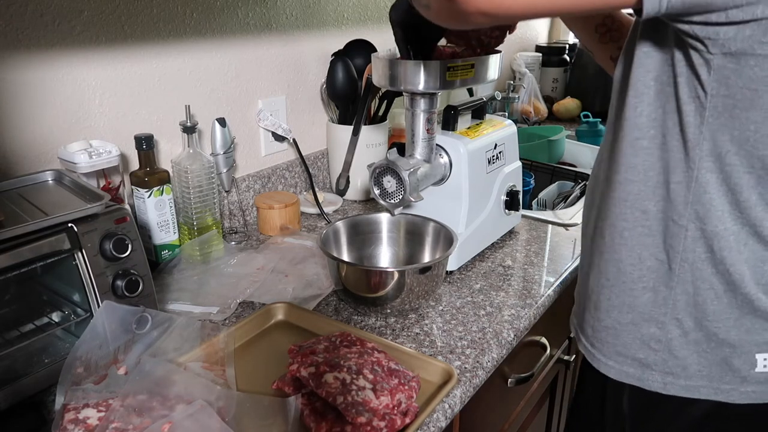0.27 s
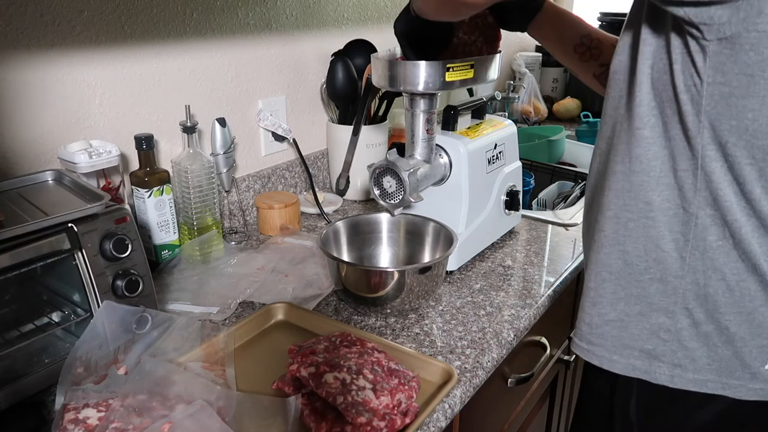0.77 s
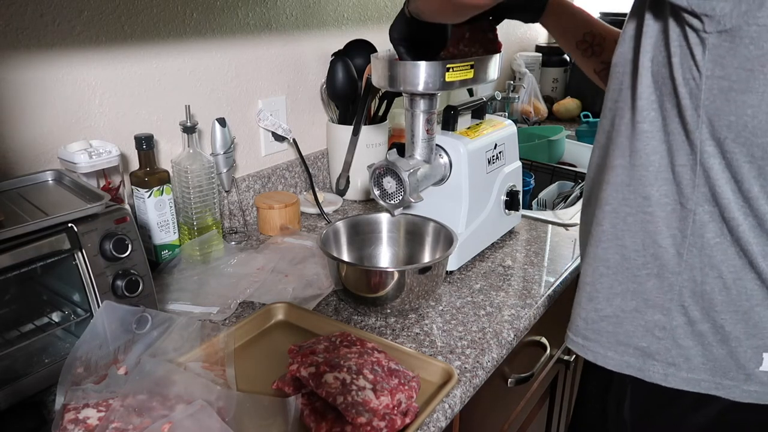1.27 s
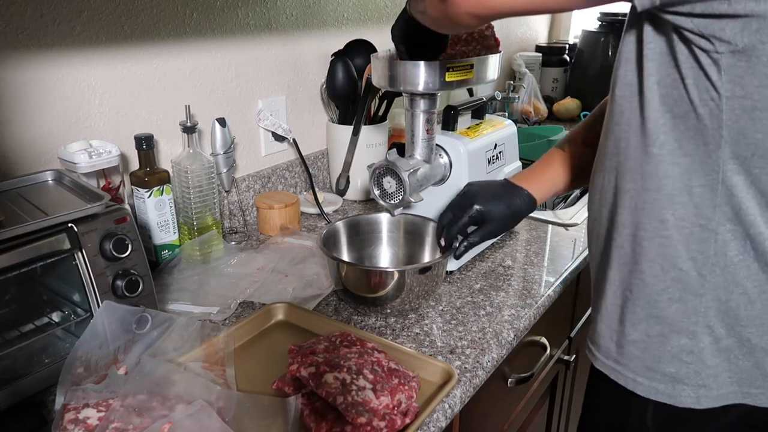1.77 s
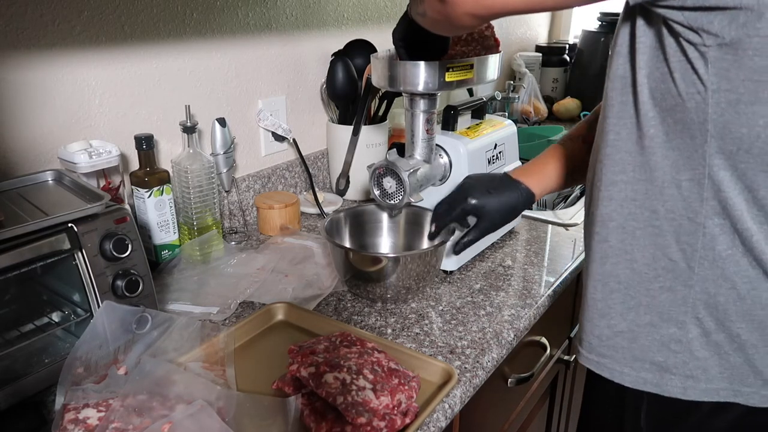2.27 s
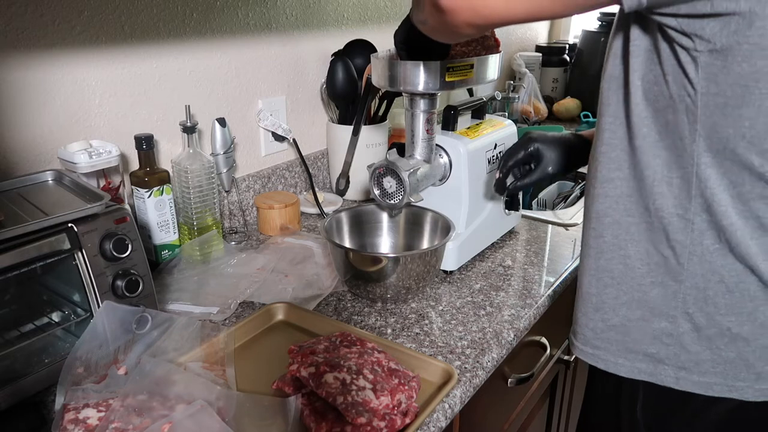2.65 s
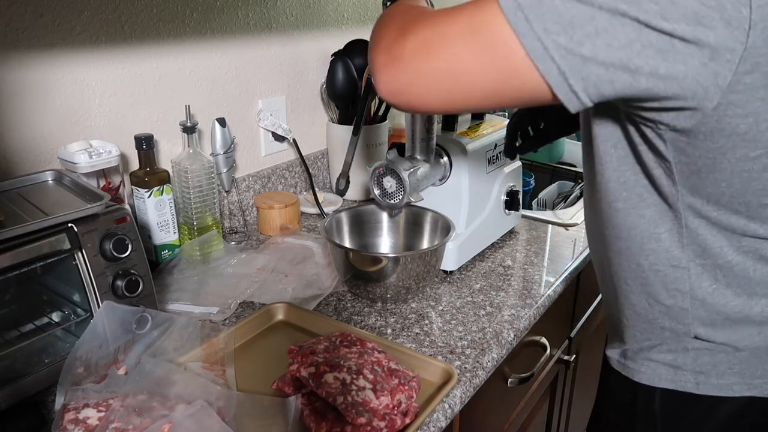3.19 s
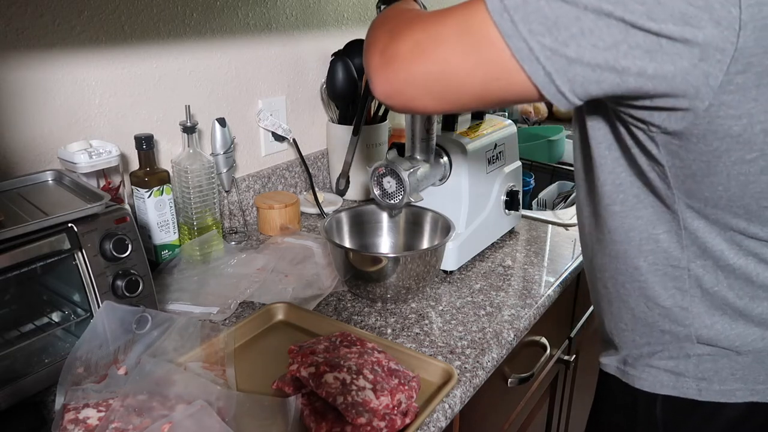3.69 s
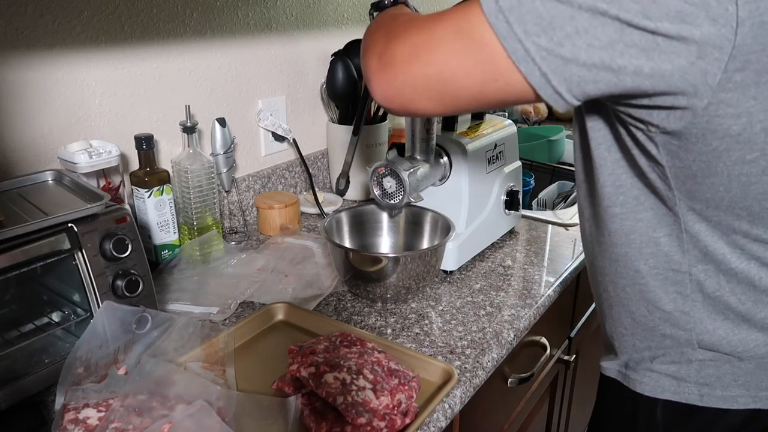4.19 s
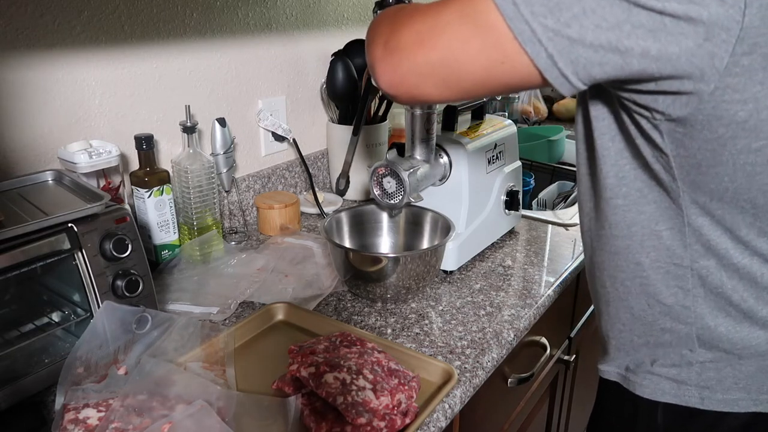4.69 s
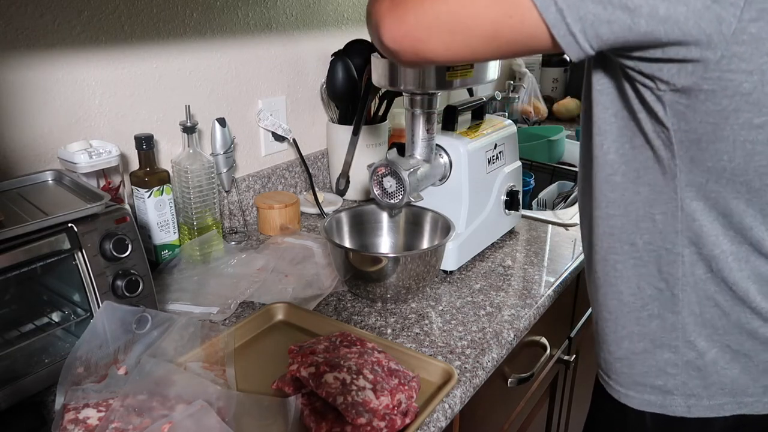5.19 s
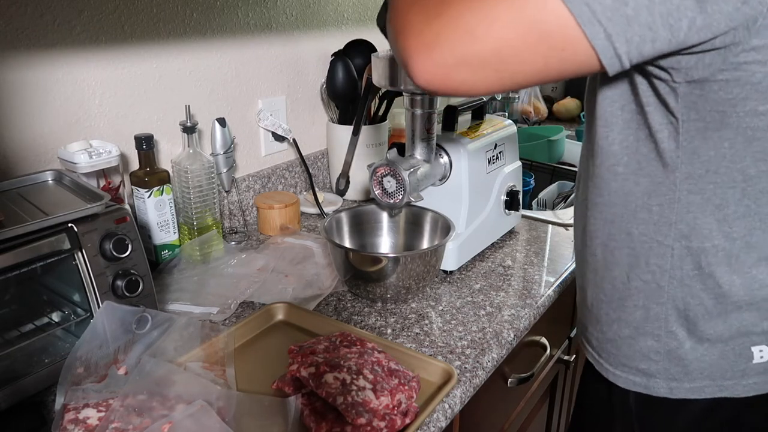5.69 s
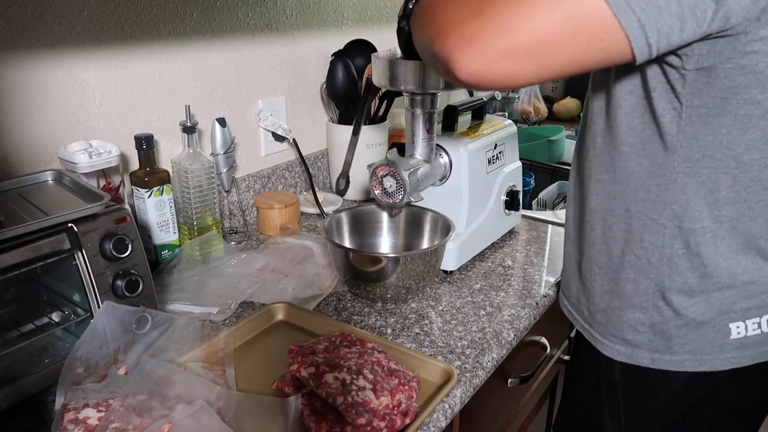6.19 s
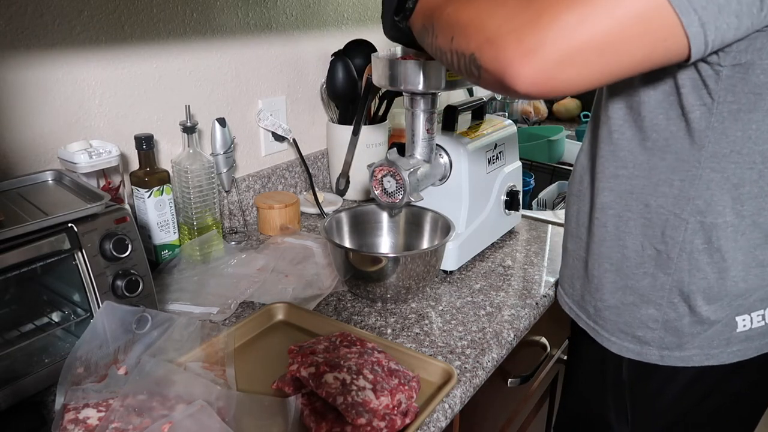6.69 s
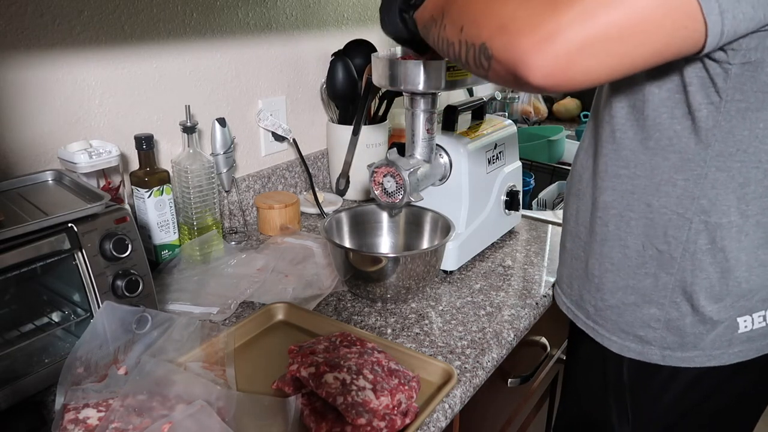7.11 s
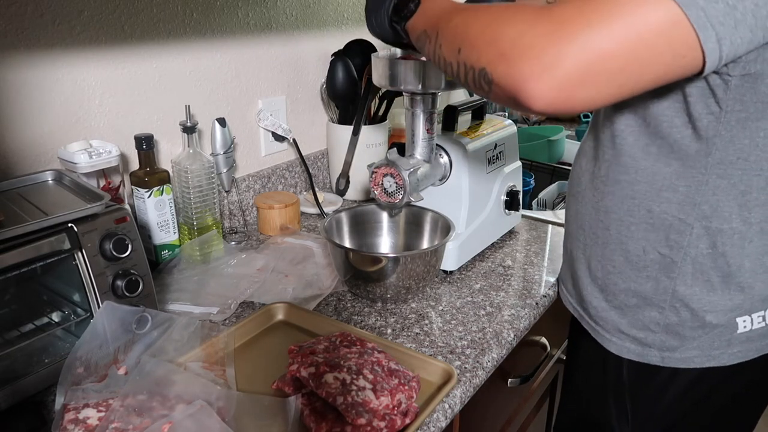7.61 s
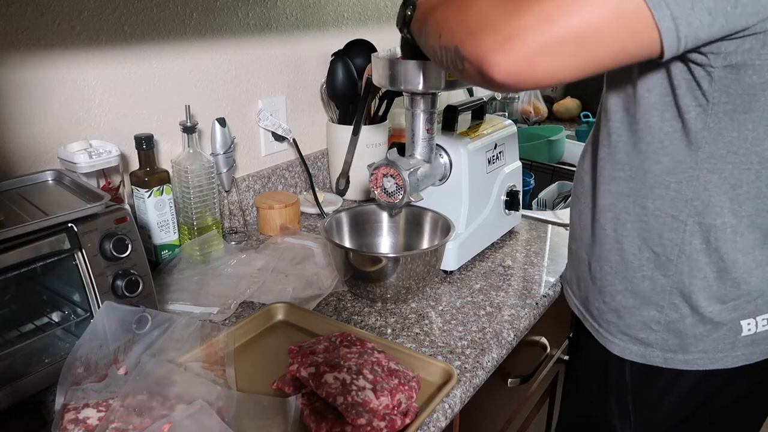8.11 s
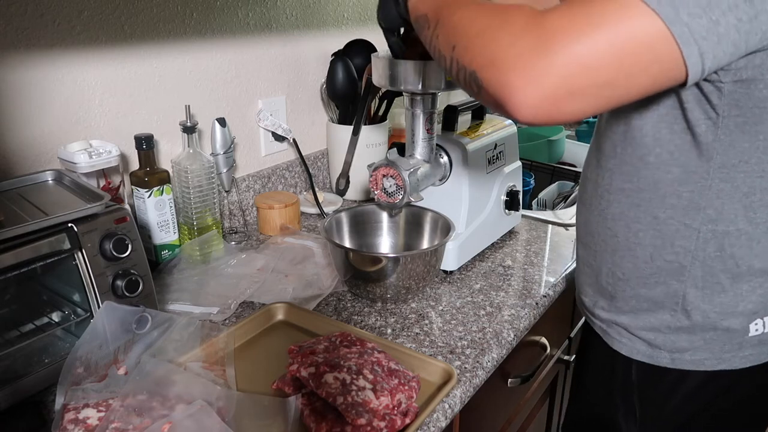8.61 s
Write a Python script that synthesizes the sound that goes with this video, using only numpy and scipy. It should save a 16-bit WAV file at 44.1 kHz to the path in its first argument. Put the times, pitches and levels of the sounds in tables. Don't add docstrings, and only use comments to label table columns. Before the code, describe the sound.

An electric meat grinder is already running on a stone kitchen counter, with a high gear whine, low hum, rough rattle and light hiss. Around two seconds a knuckle knocks the counter once, with tiny rebounds. The motor then labors, pitch sinking and rattle dulling, before recovering slightly at the end. Close, dry stereo from a small camera microphone, mostly centered.

```python
import sys
import numpy as np
from scipy import signal
from scipy.fft import irfft
from scipy.io import wavfile
from scipy.ndimage import uniform_filter1d

SR = 44100
rng = np.random.default_rng(int(sys.argv[2]) if len(sys.argv) > 2 else 0)


def file_out(sig):
    cols = np.atleast_2d(sig).T
    lim = np.clip(cols, -1, 1)
    pcm = np.round(lim * 32767).astype(np.int16)
    wavfile.write(sys.argv[1], SR, pcm)


def volts(x):
    e = np.asarray(x, float) / 20
    return 10 ** e


N = 390285

PINION, WHEEL = 7, 47
FAN_BLADES = 13
# (time [s], shaft speed [Hz], looseness of the gears [dB], push on the teeth [dB])
DRIVE = [(0.0, 266.3, 1, -0.5), (0.16, 264.8, 1.7, 1), (0.77, 267, 1.5, 2), (1.16, 260.7, 1.5, 0.5),
         (2.29, 260.9, 1, 0.5), (2.74, 255.5, 0.3, 0.5), (3.29, 257, 2.5, -3.5), (3.47, 253.1, 2.0, -1),
         (4.32, 252.3, -0.7, -1), (4.57, 253.8, 0.5, -1), (5.15, 249.3, -0.2, -0.5), (5.52, 250.5, 1.4, 1),
         (5.75, 243.4, -1.5, 0), (6.1, 241.5, -0.5, 0), (6.45, 238.5, -2.4, 0.5), (7.27, 243.8, -3.5, -0.5),
         (7.52, 243, -4.5, 0), (8.85, 248.6, 0.3, -1)]
# (frequency [Hz], side minus mid [dB])
PORT_SPREAD = [(60, -43), (110, -33), (200, -49), (370, -13.5), (690, -27.5), (1260, -21), (2320, -20),
               (4270, -7.5), (7850, -0.5), (14400, 3)]


def evened(x):
    return x / np.sqrt(np.mean(abs(x) ** 2) + 1e-20)


def read(points, hz):
    f, value = np.transpose(points)
    return np.interp(np.log(hz + 1), np.log(f + 1), value)


def curves(rows, t):
    s, *columns = np.transpose(rows)
    return [np.interp(t, s, c) for c in columns]


def wander(rate_hz):
    hz = np.fft.fftfreq(2048, 200 / SR)
    spectrum = rng.standard_normal((2048, 2)) @ [1, 1j] / (1 + (hz / rate_hz) ** 2)
    return np.interp(np.arange(N) / 200, np.arange(2048), evened(np.fft.ifft(spectrum)))


def band(hz, lo_hz, hi_hz):
    return np.clip((hz - lo_hz) / (hi_hz - lo_hz), 0, 1)


def contact_db(events, t):
    out = np.zeros(N)
    for s, db, length in events:
        near = slice(max(round((s - length) * SR), 0), round((s + length) * SR))
        out[near] += db * np.exp(-(2 * (t[near] - s) / length) ** 4)
    return out


def kitchen():
    mains_hz, mains_db, rumble_db = 59, -78, -82
    phasor = np.exp(2j * np.pi * mains_hz * np.arange(N) / SR)
    hum = np.sqrt(2) * volts(mains_db) * (1 + 0.36 * wander(2.5)) * phasor
    deep = signal.butter(1, [25, 70], "band", fs=SR, output="sos")
    rumble = signal.sosfilt(deep, rng.standard_normal(N))
    both = hum.real + volts(rumble_db) * evened(uniform_filter1d(rumble, size=200))
    return np.array([both, volts(-34) * both[::-1]])


def knocks():
    # (time [s], level [dB], hardness [0-1])
    contacts = [
        (2.165, -17, 1.),
        (2.177, -28, .5),
        (2.203, -25, .7),
    ]
    # (frequency [Hz], level [dB], t60 [s])
    counter_modes = [(105, -6, .18), (140, -3, .24), (205, 7, .14), (300, 0, .11), (390, -4, .12),
                     (510, -1, .1), (640, -3, .1), (950, 0, .07), (1180, 0, .04), (1420, 5, .05)]
    out, t = np.zeros(N), np.arange(12000) / SR
    dull = signal.butter(2, [150, 2600], "band", fs=SR, output="sos")
    tick = np.exp(-((t - .0012) / .00012) ** 2) - .4 * np.exp(-((t - .0006) / .0003) ** 2)
    for s, db, hard in contacts:
        ring = np.zeros(len(t))
        for f, mode_db, t60 in counter_modes:
            swell = 1 - np.exp(-t * f * 0.76)
            decay = volts(mode_db - 60 * t / t60) * hard ** (f / 700)
            ring += decay * swell * np.sin(2 * np.pi * f * t)
        smear = signal.sosfilt(dull, rng.standard_normal(len(t)) * volts(-60 * t / 0.075))
        out[round(s * SR):][:len(t)] += volts(db) * (.2 * ring + .8 * hard * smear + 1.2 * hard * tick)
    return np.array([out, volts(-31) * out])


def screw_swing():
    screw_per_shaft, start_turn = .012179, 0.031
    shaft = np.cumsum(curves(DRIVE, np.arange(N) / SR)[0]) / SR
    return np.cos(2 * np.pi * (screw_per_shaft * shaft - start_turn))


def shaft_turns():
    ripple_hz, ripple_free_hz = 0.94, 0.44
    hz = curves(DRIVE, np.arange(N) / SR)[0]
    free = (hz - 250) / 15
    return np.cumsum(hz + (ripple_hz + ripple_free_hz * free) * screw_swing()) / SR


def wheel_flaws(turns, changes_per_s=2.5):
    # (multiple of the wheel's turn, extra level [dB])
    strong_flaws = [(8, 6), (12, 5), (17, 4), (18, 4), (19, 4), (24, 3), (25, 4), (34, 5), (36, 4), (51, 4),
                    (62, 4), (73, 3), (74, 3), (76, 5), (83, 5)]
    order = np.arange(4097)
    lines = rng.standard_normal((40, 4097, 2)) @ [1, 1j] * (order < 150) * (order > 4)
    lines *= volts(1.8 * rng.standard_normal(4097))
    lines[:, [k for k, _ in strong_flaws]] *= volts(np.array([db for _, db in strong_flaws]))
    patterns = irfft(lines / np.sqrt(np.mean(abs(lines[:, :150]) ** 2)))
    place = (turns * PINION / WHEEL % 1 * 8192).astype(int)
    age = np.clip(np.arange(N) / SR * changes_per_s, 0, 38)
    old, fade = age.astype(int), np.pi / 2 * (age % 1)
    return evened(patterns[old, place] * np.cos(fade) + patterns[old + 1, place] * np.sin(fade))


def housing_power(hz, free):
    # (frequency [Hz], level [dB per Hz])
    broad_colour = [(30, -42), (80, -29), (165, -13), (200, 3.5), (330, -2), (560, -17.5), (1030, -3.5),
                    (1500, -3), (3600, 2), (4500, -8), (8000, -23), (13500, -33), (14100, -51),
                    (15000, -50)]
    # (frequency [Hz], width [Hz], level [dB], gain when the motor runs free [dB])
    housing_modes = [(116, 28.4, 2, 0.5), (209, 20.5, 11.5, 1.5), (428, 38, 2, -2.5),
                     (647.5, 126, 7.5, -0.5), (799, 122, 4.5, 0), (924, 35, 2.5, 6.5), (1284, 46, 3, 1.5),
                     (1705, 127, 5.5, -6), (1920, 103, 5, 2), (2228, 160, 1.5, 2), (2541, 76, 9, -1),
                     (2692, 164, 5.5, 1), (2863, 68, 11, -1.5), (3085, 72, 8.5, -3.5),
                     (3346, 130, 11, -5.5), (4120, 66, -4, -10)]
    power = volts(2 * read(broad_colour, hz))[:, None]
    for f, width, db, free_db in housing_modes:
        peak = 1 / (1 + (2 * (hz - f) / width) ** 2) ** 2
        power = power + np.outer(peak, volts(2 * (db + free_db * free)))
    return power


def noise_level_db(hz, t, free):
    # (usual level [dB], slope [dB per dB of looseness])
    noise_layers = [
        (-70.5, 1.1),
        (-41.5, 0.93),
        (-38, 0.97),
        (-50.5, 1.02),
    ]
    loose = curves(DRIVE, t)[1]
    low, rumble, grind, hiss = (db + slope * loose for db, slope in noise_layers)
    screw = np.interp(t * SR + 300, np.arange(N), screw_swing()) * np.clip(free + 0.24, 0, 1)
    rumble, grind, hiss = rumble + 0.31 * screw, grind + 0.63 * screw, hiss + 0.23 * screw
    level_db = np.zeros((len(hz), len(t))) + low + 23.2
    for db, lo_hz, hi_hz in ((rumble, 170, 400), (grind - 3., 1100, 2000), (hiss + 10.07, 3600, 4600)):
        level_db += band(hz, lo_hz, hi_hz)[:, None] * (db - level_db)
    flicker = evened(uniform_filter1d(rng.standard_normal(len(t)), size=3))
    shudder_db = 0.19 + 0.54 * band(hz, 2400, 4500) - 0.96 * band(hz, 6000, 8000)
    return level_db + shudder_db[:, None] * flicker


def running_noise(turns):
    hz, t, flaws = signal.stft(wheel_flaws(turns), SR, nperseg=2048, noverlap=1536)
    fresh, other = (signal.stft(v, SR, nperseg=2048, noverlap=1536)[2] for v in rng.standard_normal((2, N)))
    free = (curves(DRIVE, t)[0] - 250) / 15
    patches = rng.standard_normal(flaws.shape)
    patches = evened(uniform_filter1d(uniform_filter1d(patches, 20, 0), 5, 1))
    level_db = noise_level_db(hz, t, free) + 1.44 * patches + 12.5
    gain = np.sqrt(housing_power(hz, free)) * volts(level_db)
    share = (0.35 + 0.24 * band(hz, 900, 2800)) * (1 - band(hz, 4700, 4800))
    share = np.clip(share, 0, 1)[:, None]
    mid = gain * (np.sqrt(1 - share) * fresh + np.sqrt(share) * volts(-8.5) * flaws)
    side = volts(read(PORT_SPREAD, hz))[:, None] * (.3j * mid + 1.235 * gain * other)
    return signal.istft(np.array([mid, side]), SR, nperseg=2048, noverlap=1536)[1][:, :N]


def strong_orders(t):
    # (shaft speed [Hz], hum [dB], tooth mesh [dB], fan blade tone [dB],
    # double mesh whine [dB])
    speed_response = [(238.7, -32, -48.5, -57, -32.5), (242.35, -36, -39, -56, -36.5),
                      (244.5, -37.5, -42, -53, -29), (247.3, -37.5, -41, -57, -35.5),
                      (252.3, -42, -45.5, -43, -32), (255.2, -40, -52, -39.5, -36),
                      (259, -35, -56, -40.5, -42.5), (265.7, -40.5, -50.5, -41.5, -37)]
    # (time [s], change of the mesh tone [dB], length [s])
    screw_bites = [(0.073, 11.5, 0.14), (0.407, 15.0, 0.17), (0.574, -7, 0.16), (0.689, 13.5, 0.115),
                   (1.31, 10, 0.079), (3.626, 5, 0.27), (3.962, 6, 0.117), (4.291, 8.5, 0.14),
                   (4.424, -11, 0.127), (4.598, 11.5, 0.067), (4.952, 9.5, 0.11), (5.069, -4, 0.085),
                   (5.313, 7, 0.11), (5.595, -7.5, 0.085), (5.941, -4, 0.14), (6.192, -6, 0.06),
                   (6.639, 10.5, 0.085), (6.974, 8, 0.12), (7.133, 6.5, 0.048), (7.281, 8.5, 0.11),
                   (7.632, 4.2, 0.075), (8.122, -11, 0.181), (8.298, 3, 0.092), (8.448, -16, 0.039),
                   (8.707, 3, 0.035)]
    # (time [s], change of the fan tone [dB], length [s])
    fan_gusts = [(0.061, -12.2, 0.184), (0.582, -15, 0.116), (0.867, 3.5, 0.18), (1.039, -11.5, 0.126),
                 (1.16, -2, 0.13), (1.303, -11.3, 0.066), (1.513, 0, 0.09), (1.703, 20, 0.04),
                 (1.712, -13, 0.142), (2.143, 4, 0.077), (2.251, -4, 0.11), (2.424, 4, 0.089),
                 (2.789, 6, 0.091), (2.888, -13, 0.078), (3.086, -14, 0.046), (3.351, -6, 0.252),
                 (3.619, 7.5, 0.044), (3.789, -7.1, 0.072), (4.053, 1, 0.094), (4.234, -8.0, 0.046),
                 (4.697, 3.9, 0.186), (4.793, -5, 0.044), (5.01, 1, 0.27), (6.098, 15, 0.17),
                 (8.792, 9, 0.14)]
    # (time [s], change of the whine [dB], length [s])
    tooth_slips = [(0.085, 3, 0.168), (0.252, -19, 0.17), (0.418, 2, 0.058), (0.573, -13, 0.25),
                   (1.128, -17, 0.12), (1.278, 10.5, 0.08), (1.752, -16, 0.11), (1.905, 7.1, 0.06),
                   (2.171, -19, 0.13), (2.443, -14, 0.14), (2.574, 5.5, 0.063), (3.208, 8, 0.082),
                   (3.392, -29, 0.17), (3.604, -13, 0.096), (4.168, 2, 0.059), (4.266, -9.7, 0.061),
                   (4.448, -6.8, 0.15), (5.016, 5.0, 0.12), (5.242, -10, 0.182), (5.537, -10, 0.042),
                   (5.807, 3.5, 0.098), (6.077, -17, 0.075), (7.102, 4.5, 0.15), (7.46, 6.5, 0.081),
                   (7.741, 3, 0.12), (8.006, 4, 0.074), (8.068, -7, 0.039), (8.464, -11, 0.08),
                   (8.612, 7, 0.065), (8.804, 5.5, 0.092)]
    chatter, dropout_db = 0.3, 21.5
    speed, _, push = curves(DRIVE, t)
    hum, mesh, fan, whine = curves(speed_response, speed)
    free = np.clip((speed - 245) / 15, 0, 1)
    lost_db = dropout_db * (.12 + free) * np.clip(np.sqrt(2) * wander(18).real - .9, 0, 2)
    whine = whine + push + contact_db(tooth_slips, t) - lost_db
    return [(1, hum - 0.1 * screw_swing(), .12),
            (PINION, mesh + 0.52 * push + contact_db(screw_bites, t), .24),
            (FAN_BLADES, fan + contact_db(fan_gusts, t), .6),
            (2 * PINION, whine, .14 + chatter * free)]


def tones(turns):
    # (time [s], level to the left [dB])
    whine_lean = [(0.0, -1), (0.34, 0), (1.06, -1.5), (2.86, -1), (3.52, 0), (4.24, -3), (4.95, -3.5),
                  (7.84, 1), (8.85, -1)]
    # (multiple of shaft speed, level at the start [dB], level at the end [dB], roughness [0-1])
    weak_orders = [(2, -61, -64, .6), (3, -52, -50, .33), (7.6, -50, -58, .7), (15, -48, -64, .5),
                   (17, -55, -59, .5), (17.42, -64, -61, .6), (18.25, -62, -70, .7), (21, -63, -67, .5),
                   (24, -71, -71, .6), (28, -73, -70, .6), (34, -80, -83, .6), (35, -76, -73, .5),
                   (40, -83, -83, .6), (42, -83, -84, .6)]
    t = np.arange(N) / SR
    lean = np.tanh(curves(whine_lean, t)[0] * np.log(10) / 40)
    weak = [(k, a + (b - a) * t / t[-1], rough) for k, a, b, rough in weak_orders]
    mid, side = np.zeros((2, N))
    for k, db, rough in strong_orders(t) + weak:
        rate_hz = 22 if k in (PINION, FAN_BLADES, 2 * PINION) else 7
        flutter = np.sqrt(1 - rough ** 2) + rough * wander(rate_hz)
        if k % PINION == 0:
            flutter *= 1 + 0.07 * np.cos(2 * np.pi * turns * PINION / WHEEL)
        phase = 2j * np.pi * ((k * turns + rng.random()) % 1)
        tone = np.sqrt(2) * volts(db) * flutter * np.exp(phase.astype(np.complex64))
        spread = volts(read(PORT_SPREAD, k * 250) - 3.) * wander(1.5)
        mid += tone.real
        side += (tone * (spread + 1.4 * lean * (k > 10))).real
    return np.array([mid, side])


def scene():
    turns = shaft_turns()
    mid, side = kitchen() + knocks() + running_noise(turns) + tones(turns)
    return np.array([mid + side, mid - side])


def mute_faint_bands(x):
    # (frequency [Hz], depth [dB])
    mute_depth = [(100, 30.5), (1000, 19), (2900, 8.5), (3400, 31), (7500, 11), (8500, 3.5), (13300, 9.5),
                  (13900, -2), (15000, 1)]
    window, lead = np.sin(np.pi * (np.arange(2048) + .5) / 2048), 280
    pair = np.pad([x[0] + x[1], x[0] - x[1]], ((0, 0), (lead, 0))) / 2
    hz, _, z = signal.stft(pair, SR, window, 2048, 1024)
    power = abs(z) ** 2 + 1e-16
    usual_db = 10 * np.log10(uniform_filter1d(uniform_filter1d(power.sum(0), 24, 0), 15, 1))
    chance = evened(uniform_filter1d(rng.standard_normal((2, 65, z.shape[2])), size=2))
    chance = 6.0 * chance[:, np.arange(len(hz)) // 16] + 1.5 * chance[:, -1:]
    chance[0] *= band(hz, 3000, 8000)[:, None]
    chance[1] = evened(uniform_filter1d(chance[1], size=3)) * (9 - 6.5 * band(hz, 2900, 3100)[:, None])
    whine_db = 10 * np.log10(power[0, (hz > 3250) & (hz < 3800)].sum(0))
    above = ((hz > 3620) & (hz < 5300))[:, None]
    near_whine_db = np.where(above, 3.0 * (whine_db + 31.5) - 65.5 - 0.01 * (hz[:, None] - 4000), -200)
    limit_db = np.maximum(usual_db - read(mute_depth, hz)[:, None] + chance, near_whine_db + .4 * chance)
    limit_db[0, hz < 3500] = -200
    z = z * (10 * np.log10(uniform_filter1d(power, size=3, axis=1)) > limit_db)
    mid, side = signal.istft(z, SR, window, 2048, 1024)[1][:, lead:lead + N]
    return np.array([mid + side, mid - side])


def band_limit(x):
    return signal.sosfilt(signal.butter(12, 15030, fs=SR, output="sos"), x)


def record(dry):
    mix = mute_faint_bands(dry)
    return band_limit(mix)


dry = scene()
out = record(dry)
file_out(out)
```